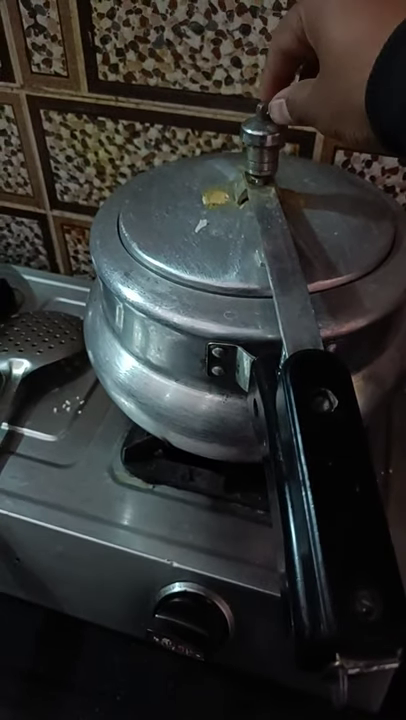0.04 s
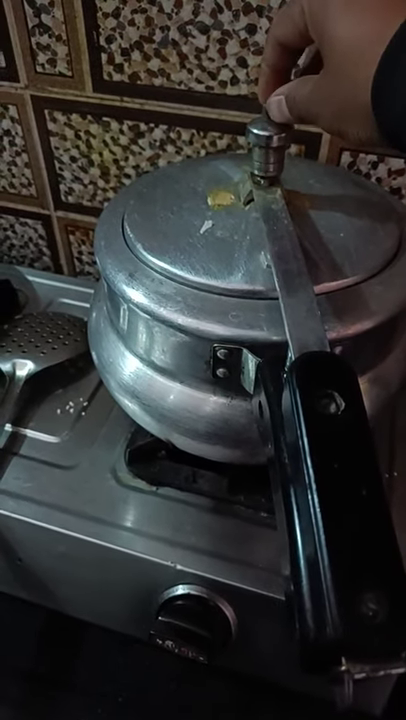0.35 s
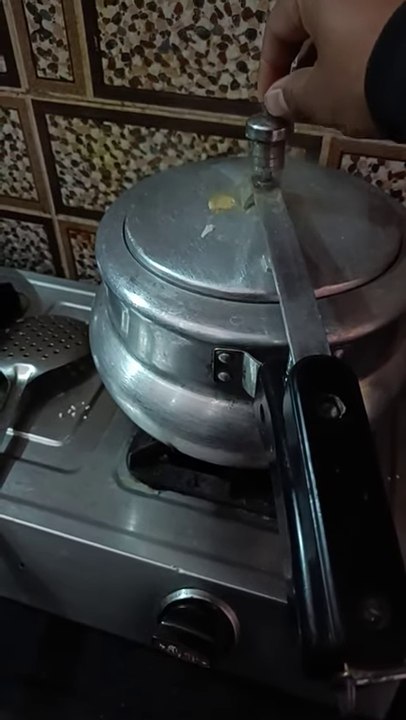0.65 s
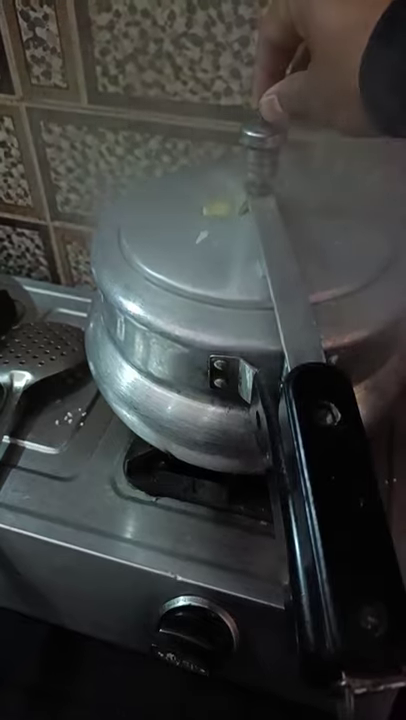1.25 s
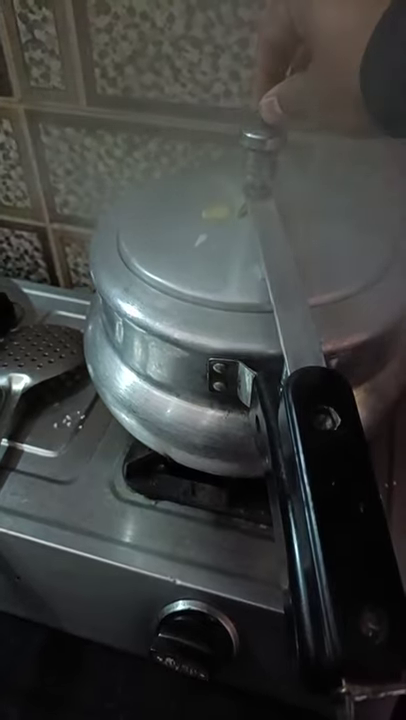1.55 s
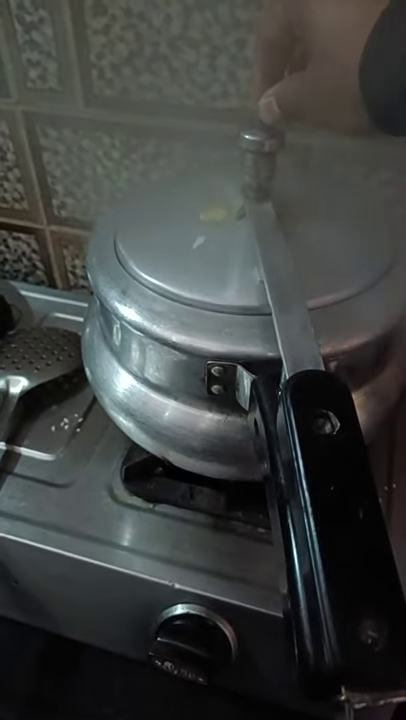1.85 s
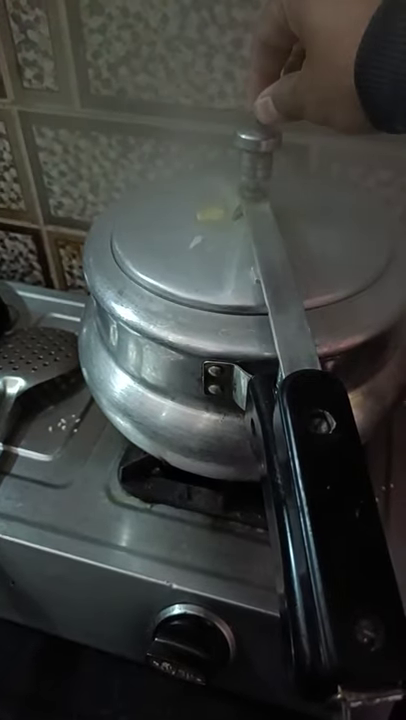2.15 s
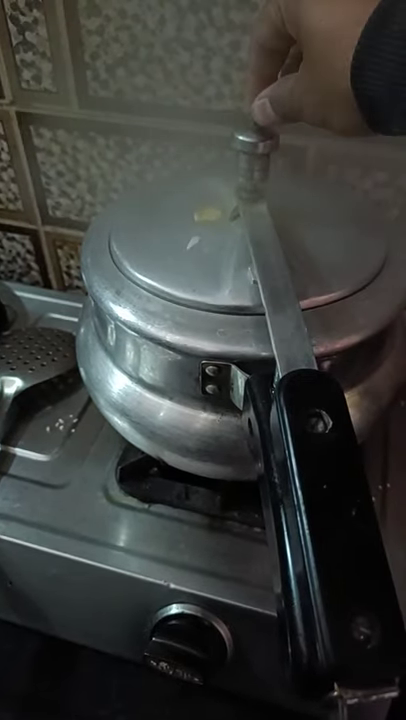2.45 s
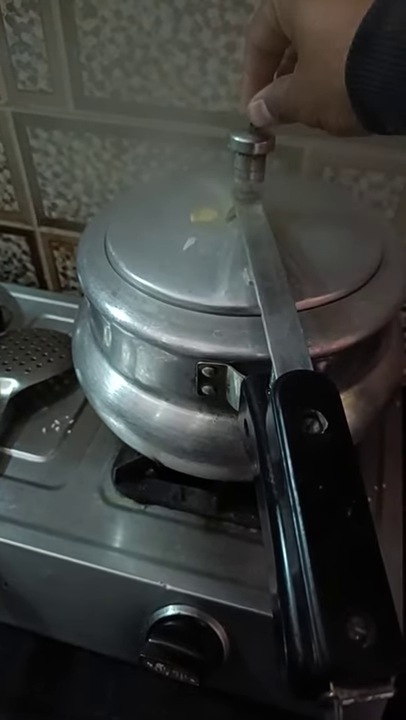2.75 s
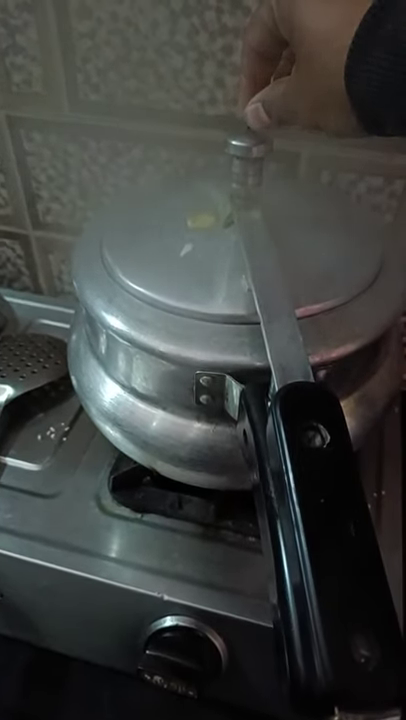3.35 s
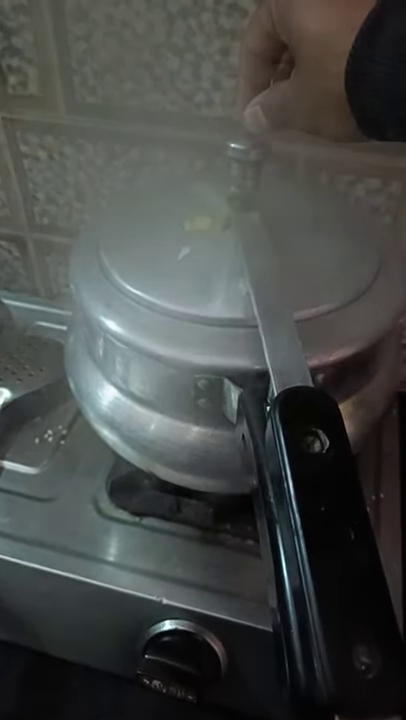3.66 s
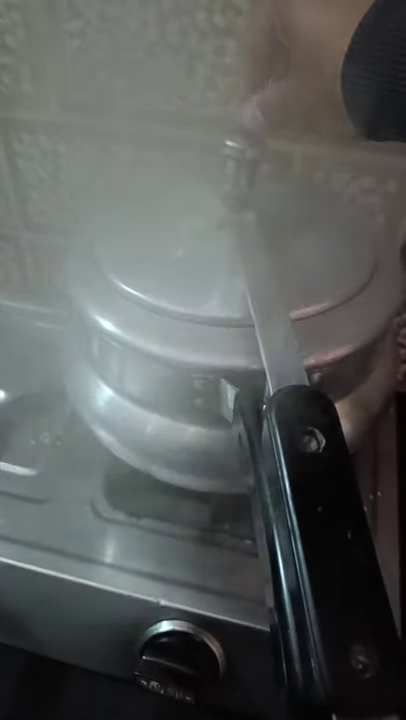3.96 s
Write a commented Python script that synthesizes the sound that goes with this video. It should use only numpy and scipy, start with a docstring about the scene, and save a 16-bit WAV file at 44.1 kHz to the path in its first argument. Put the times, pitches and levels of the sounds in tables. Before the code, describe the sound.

Loud steam hisses from a pressure cooker valve, heard close up in a tiled kitchen. Light metal clatter and a brief spurt come first; the long hiss then crackles wetly and whistles faintly, with low pops of air hitting the microphone.

```python
"""Pressure cooker venting

A hand lifts the weight on a cooker's vent, close to a phone in a small tiled kitchen. The weight knocks,
lets out one short spurt, then a long loud hiss that rings the gap round the vent. The wet jet sputters
until it runs dry near the end, and puffs of air pop on the left microphone."""
import sys
import numpy as np
from scipy import signal
from scipy.fft import rfft, irfft
from scipy.io import wavfile

SR = 44100
rng = np.random.default_rng(int(sys.argv[2]) if len(sys.argv) > 2 else 0)


def int16_out(signal):
    """Quantize to a 16-bit WAV file."""
    q = np.round(np.clip(np.atleast_2d(signal).T, -1, 1) * 32767)
    wavfile.write(sys.argv[1], SR, q.astype(np.int16))


N = 176400
T = np.arange(N) / SR
FREQS, GRID_HZ = np.arange(N // 2 + 1) * SR / N, np.linspace(0, SR / 2, 2049)


# First spurt (time [s], level [dB])
SPURT_FLOW = [(0, -79), (.2, -61), (.34, -62.5), (.352, -45), (.374, -38), (.379, -32), (.392, -38.5),
              (.405, -27.5), (.426, -24.5), (.455, -29), (.5, -47.5), (.615, -55.5)]
# Spits in the spurt (time [s], boost [dB])
SPURT_SPITS = [(.378, 6), (.401, 4.6), (0.411, 2.6), (0.419, 8.6), (0.426, 7.6)]
# Long release (time [s], level [dB], low band [dB], treble [dB], left minus right [dB])
RELEASE_FLOW = [(0.64, -29.5, -8, -9, 3), (0.65, -20.5, -2.5, -5.5, 2), (0.67, -15.5, -4.5, -5, -0.5),
                (0.86, -19, -8, -5, 1.5), (1.47, -20, -8, -6, 1.5), (1.75, -21, -7.5, -5.5, 2.5),
                (2.82, -19.5, -8.5, -6.5, 2.5), (2.92, -21.5, -7, -6.5, 4.5), (3.46, -23.5, -6, -3, 4),
                (3.52, -23, -9.5, -6, 0), (3.61, -27.5, -6.5, -4.5, 4), (4.0, -25, -7, -2.5, 3)]
# Hiss spectrum (frequency [Hz], left [dB], right [dB])
HISS_COLOUR = [(1000, -38, -39.5), (1700, -27, -21), (2050, -10.5, -6), (2350, -19.5, -18),
               (2960, -13, -10.5), (3540, -7, -7), (3930, -8.5, 1), (4560, -8.5, -2.5), (6100, -6.5, 1),
               (6780, -1.5, -2.5), (7950, -3.5, -9), (8180, -6.5, -9.5), (12900, -9, -11.5),
               (13900, -15.5, -13)]
# Vent gap and lid resonances (frequency [Hz], half width [Hz], left [dB], right [dB])
VENT_PEAKS = [(4026, 60, 0, 4), (4285, 36, 5, 1.5), (4466, 45, 5.5, 2.5), (4704, 44, -3, -1),
              (4770, 40, 4, 4), (5090, 32, -4, 3.5), (6000, 60, -5, 5), (6645, 53, 7, 5), (7023, 52, 6, 6),
              (7480, 35, 4.5, -9), (7840, 67, 3, 6)]
# Hiss common to both microphones (frequency [Hz], power share [0-1])
HISS_COMMON = [(2400, 0.74), (5500, 0.1), (8000, 0.31), (13000, 0.17)]

def hiss(right_lag_s=0.00028, low_edge_hz=4340, treble_edge_hz=7640, gain_db=1.5, balance_db=-1):
    """Turbulence rings the vent's resonances; level and brightness follow the lift of the weight."""
    share = np.interp(FREQS, *np.array(HISS_COMMON).T)
    direct = white(channels=1) * np.exp(-2j * np.pi * np.outer([0, right_lag_s], FREQS))
    turbulence = np.sqrt(share) * direct + np.sqrt(1 - share) * white()
    peaks_db = sum(np.outer(pair_db, bump(GRID_HZ, hz, width)) for hz, width, *pair_db in VENT_PEAKS)
    jet = colour(turbulence, HISS_COLOUR, peaks_db)
    below, above = FREQS < low_edge_hz, FREQS > treble_edge_hz
    low, middle, treble = (irfft(jet * band, N) for band in (below, ~(below | above), above))
    _, low_db, treble_db, pan_db = curve(RELEASE_FLOW)
    steam = unit(low * undb(low_db - low_db.mean()) + middle + treble * undb(treble_db - treble_db.mean()))
    flow_db = curve(list(SPURT_FLOW) + [row[:2] for row in RELEASE_FLOW])
    flutter_db = 0.75 * walk(hz=25.18) + 0.55 * walk(hz=402.4)
    spits_db = sum(db * bump(T, time_s, spread=0.0013) for time_s, db in SPURT_SPITS)
    sides_db = np.outer([.5, -.5], pan_db + balance_db)
    return steam * undb(gain_db + flow_db + flutter_db + spits_db + sides_db)


# Rim whistle (time [s], pitch [Hz], level [dB], partner level [dB])
RIM_TONE = [(.62, 5400, -90, -90), (.67, 5420, -21.5, -20), (.9, 5390, -26, -24), (1.5, 5370, -29.5, -32),
            (2.1, 5440, -27.5, -28), (2.7, 5425, -27.5, -34), (3.3, 5450, -31, -40),
            (3.65, 5340, -34.5, -44)]

def edge_tone(width_hz=190, partner_above_hz=240, waver_hz=24.6, left_db=-19):
    """The jet splits on the rim of the weight: a breathy drifting whistle and a higher partner."""
    def narrow_noise(centre_hz):
        breath = walk(width_hz) + 1j * walk(width_hz)
        return unit(np.real(breath * np.exp(2j * np.pi * np.cumsum(centre_hz) / SR)))

    hz, db, partner_db = curve(RIM_TONE)
    hz = hz + waver_hz * walk(hz=14)
    tone = undb(db) * narrow_noise(hz) + undb(partner_db) * narrow_noise(hz + partner_above_hz)
    return np.outer(undb([left_db, 0]), tone)


# Whistle of the drying jet (time [s], level [dB])
DRY_JET_LEVEL = [(0, -110), (.7, -55), (2.8, -40.5), (3.15, -28), (3.65, -30), (4, -26.5)]
# Its resonances (frequency [Hz], half width [Hz], left [dB], right [dB])
DRY_JET_PEAKS = [(3960, 240, -6.5, 1), (6060, 24, -16, 3.5), (6860, 60, -2, 1), (6860, 47, -11, -4),
                 (7350, 40, 4, -10)]

def dry_whistle():
    """With less water in it, the jet sings more narrowly in the vent."""
    response = sum(np.outer(undb(pair_db), bump(GRID_HZ, hz, width))
                   for hz, width, *pair_db in DRY_JET_PEAKS)
    gains = np.array([np.interp(FREQS, GRID_HZ, side) for side in response])
    return unit(irfft(white() * gains, N)) * undb(curve(DRY_JET_LEVEL))


# Water in the jet (time [s], level [dB])
SPUTTER_LEVEL = [(0, -80), (.34, -76), (.378, -50.5), (.44, -37), (.48, -52), (.62, -61), (.655, -38),
                 (.76, -34.5), (.87, -38.5), (2.8, -39.5), (3.3, -43.5), (3.56, -44), (3.63, -58),
                 (4, -54.5)]
# Crackle spectrum (frequency [Hz], left [dB], right [dB])
CRACKLE_COLOUR = [(30, -29, -28), (94, -6, -17), (166, 3.5, -13), (223, 2.5, -9.5), (336, 6, -9),
                  (780, 5, -0.5), (1270, 2.5, 1.5), (1870, 1, -2.5), (2330, -12, -14.5), (3870, -18, -22),
                  (8000, -45, -45)]

def sputter(gain_db=-1):
    """Water carried up the vent bursts into a dense low crackle, which fades as the jet dries."""
    bursts = impacts(per_s=2500, spread_db=4)
    crackle = irfft(colour(rfft(bursts), CRACKLE_COLOUR), N)
    return unit(crackle) * undb(curve(SPUTTER_LEVEL) + gain_db)


# Knocks of the weight (time [s], level [dB], tilt [dB/octave], contact peak [Hz])
WEIGHT_KNOCKS = [(.096, -36.5, 5, 1330), (.163, -32.5, 1.5, 1070), (.453, -20.5, 5.5, 950),
                 (.652, -26.5, 3, 776), (.685, -24, 1.5, 650)]
# Weight and lid modes (frequency [Hz], level [dB], t60 [s])
LID_MODES = [(319, -9, 0.33), (540, -11, .28), (630, 1, 0.17), (799, 0, 0.22), (840, 0.5, 0.19),
             (1060, -1, 0.16), (1247, -9, 0.14), (1370, -14, 0.14), (1697, -8.5, 0.17), (2003, -5.5, 0.15),
             (3505, -1.5, 0.045)]
# Clatter spectrum (frequency [Hz], level [dB])
CLATTER_COLOUR = [(100, -29), (300, 0.5), (600, 3), (1000, -0.5), (1600, -2), (2400, -14), (14000, -54)]

def knocks(attack_s=0.00065, ring_db=-13, clatter_db=-6.5, contact_db=5, contact_octaves=0.23):
    """The weight strikes the vent: a dull clatter and the ring of the lid, coloured by where it lands."""
    def emphasis_db(hz, peak_hz):
        return contact_db * bump(np.log2(hz + 1), np.log2(peak_hz), contact_octaves)

    out, t = np.zeros((2, N)), T[:SR // 3]
    attack = 1 - np.exp(-t / attack_s)
    for start_s, db, tilt_db, peak_hz in WEIGHT_KNOCKS:
        ring = np.zeros((2, len(t)))
        for hz, mode_db, t60_s in LID_MODES:
            gain = undb(mode_db + tilt_db * np.log2(hz / 1000) + emphasis_db(hz, peak_hz))
            ring += gain * decay(t, t60_s) * np.sin(2 * np.pi * (hz * t + rng.random((2, 1))))
        shape_db = tilt_db * np.log2(1 + GRID_HZ / 500) + emphasis_db(GRID_HZ, peak_hz)
        spectrum = colour(white(size=len(t)), CLATTER_COLOUR, shape_db)
        clatter = unit(irfft(spectrum, len(t))) * decay(t, t60_s=0.19)
        i = int(start_s * SR)
        out[:, i:i + len(t)] += undb(db) * attack * (undb(ring_db) * ring + undb(clatter_db) * clatter)
    return out


# Air puffs (time [s], level [dB], rise [s])
AIR_PUFFS = [(1.323, -23, 0.00034), (1.415, -16, 0.00074), (1.489, -15, 0.0005), (1.636, -22, 0.00028),
             (1.758, -21, 0.00012), (1.879, -18, 0.00041), (1.971, -27, 0.00029), (2.445, -29.5, 0.00014),
             (2.745, -11, 0.00038), (2.840, -19, 0.0006), (2.925, -23, 0.00028), (3.482, -17.5, 0.0004),
             (3.513, -10, 0.001)]
# Light buffeting (centre [s], spread [s], level [dB])
AIR_BUFFETS = [(1.38, 0.14, -43), (1.95, 0.48, -49.5), (2.9, 0.039, -36), (3.511, 0.018, -27.5)]

def puffs(fall_s=0.0016, low_cut_hz=57, puff_gain_db=7):
    """Pressure pulses and light buffeting hit the left microphone, which lets their slow part leak away."""
    def pulse(rise_s):
        return np.exp(-t / fall_s) * (1 - np.exp(-(t / rise_s) ** 2))

    t, pressure = T[:SR // 20], np.zeros(N)
    for start_s, db, rise_s in AIR_PUFFS:
        i = int(start_s * SR)
        pressure[i:i + len(t)] += undb(db + puff_gain_db) * pulse(rise_s)
    kicks = impacts(per_s=270, spread_db=3, channels=1)[0]
    eddies = unit(signal.oaconvolve(kicks, pulse(rise_s=0.00024))[:N])
    strength = sum(undb(db) * bump(T, centre_s, spread_s) for centre_s, spread_s, db in AIR_BUFFETS)
    low_cut = signal.butter(2, low_cut_hz, "high", fs=SR, output="sos")
    return np.outer([1, 0], signal.sosfilt(low_cut, pressure + eddies * strength))


# Pot notes (time [s], start pitch [Hz], end pitch [Hz], level [dB], t60 [s], left minus right [dB])
HOLLOW_NOTES = [(.097, 650, 493, -42, 0.45, -11), (.385, 300, 256, -51, .45, -7),
                (.453, 545, 512, -38.5, 0.47, -11), (.453, 350, 321, -38.5, 0.28, 0),
                (.555, 268, 245, -56, .8, -13), (.68, 390, 367, -40, 0.48, -4),
                (.69, 172, 155.5, -37, 0.19, -6), (.83, 285, 255, -48, 0.27, -3)]

def pot_notes(sink_s=.05, attack_s=0.0082, jitter=.06, rough_depth=.9, rough_hz=110):
    """Jolted by the knocks and the first steam, the pot gives rough hollow notes that sink as they fade."""
    out = np.zeros((2, N))
    for start_s, start_hz, end_hz, db, t60_s, pan_db in HOLLOW_NOTES:
        age_s = np.maximum(T - start_s, 0)
        hz = end_hz + (start_hz - end_hz) * np.exp(-age_s / sink_s)
        hz *= 1 + jitter * walk(rough_hz)
        envelope = undb(db) * (1 - np.exp(-age_s / attack_s)) * decay(age_s, t60_s)
        roughness = 1 + rough_depth * walk(rough_hz)
        note = envelope * roughness * np.sin(2 * np.pi * np.cumsum(hz) / SR)
        out += np.outer(undb([pan_db / 2, -pan_db / 2]), note)
    return out


# Leak under the weight (time [s], level [dB])
LEAK_LEVEL = [(0, -72), (.06, -81), (.1, -56.5), (.33, -62), (.38, -39), (.52, -67), (.62, -61), (.7, -82)]
# Vent pipe resonances (frequency [Hz], half width [Hz], level [dB])
PIPE_PEAKS = [(2080, 180, 0.5), (4000, 170, -0.5), (5500, 97, -1), (6040, 46, 3), (6880, 58, 8)]

def leak():
    """Before the weight is lifted clear, a thread of steam sings faintly in the vent pipe."""
    response = sum(undb(db) * bump(GRID_HZ, hz, width) for hz, width, db in PIPE_PEAKS)
    gains = np.interp(FREQS, GRID_HZ, response + 1e-9)
    return unit(irfft(white() * gains, N)) * undb(curve(LEAK_LEVEL))


def kitchen_echo(x, wet_db):
    """Tiled walls add a short dense echo."""
    t = T[:SR // 3]
    tail = rng.standard_normal((2, len(t))) * decay(t, t60_s=0.15)
    tail /= np.sqrt(np.sum(tail ** 2, axis=1, keepdims=True))
    echo = signal.fftconvolve(x, tail, axes=1)[:, :N]
    return (x + undb(wet_db) * echo) / np.hypot(1, undb(wet_db))


# Kitchen background (frequency [Hz], level [dB])
ROOM_COLOUR = [(30, -28), (150, 0), (350, 5), (600, 1), (3000, -30), (14000, -38)]

def room_tone(level_db=-66.5):
    """Faint, steady low noise of the kitchen."""
    return undb(level_db) * unit(irfft(colour(white(), ROOM_COLOUR), N))


def undb(db):
    """Decibels to gain."""
    return 10 ** (np.asarray(db) / 20)


def unit(x):
    """Scale to an rms of 1."""
    return x / np.sqrt(np.mean(x ** 2))


def decay(t, t60_s):
    """Exponential fade, 60 dB down at t60_s."""
    return np.exp(-np.log(1000) * t / t60_s)


def bump(x, centre, spread):
    """Bell curve with a top of 1."""
    return np.exp(-.5 * np.minimum(((x - centre) / spread) ** 2, 100))


def curve(rows):
    """Each column of a timed table, joined by straight lines."""
    times, *columns = np.array(rows).T
    return np.array([np.interp(T, times, c) for c in columns])


def colour(spectrum, rows, extra_db=0):
    """Weight a spectrum by a table of Hz and dB: one dB column per channel, or one for both."""
    hz, *columns = np.array(sorted(rows)).T
    grid_db = np.array([np.interp(np.log(GRID_HZ + 1), np.log(hz), c) for c in columns])
    bins_hz = np.linspace(0, SR / 2, spectrum.shape[-1])
    return spectrum * np.array([np.interp(bins_hz, GRID_HZ, g) for g in undb(grid_db + extra_db)])


def white(channels=2, size=N):
    """Spectrum of white noise."""
    return rng.standard_normal((channels, size // 2 * 2 + 2)).view(complex)


def walk(hz):
    """Random motion with a spread near 1."""
    points = rng.standard_normal(8192)
    return np.interp(T * hz, np.arange(len(points)), points)


def impacts(per_s, spread_db, channels=2):
    """Random impulses of uneven size."""
    chance = rng.random((channels, N)) * SR / per_s
    sign = rng.integers(0, 2, (channels, N)) * 2 - 1
    hit = chance < 1
    out = np.zeros((channels, N))
    out[hit] = sign[hit] * undb(spread_db * np.minimum(-np.log(chance[hit]), 5))
    return out


def scene():
    """Cooker, room and the air on the microphone."""
    background = room_tone()
    steam = kitchen_echo(hiss() + edge_tone() + dry_whistle() + leak() + sputter(), wet_db=-7)
    return steam + kitchen_echo(knocks(), wet_db=-4.5) + pot_notes() + puffs() + background


def record(dry):
    """The phone cuts the top."""
    top_hz = 14250
    return signal.sosfilt(signal.ellip(14, .2, 80, top_hz, fs=SR, output="sos"), dry)


dry = scene()
out = record(dry)
int16_out(out)
```